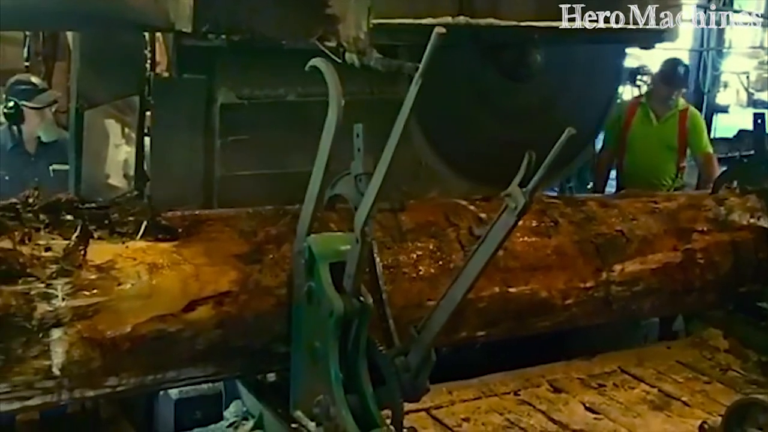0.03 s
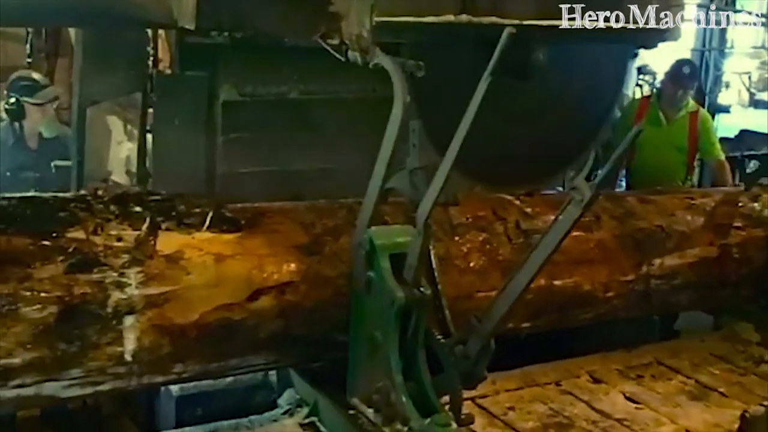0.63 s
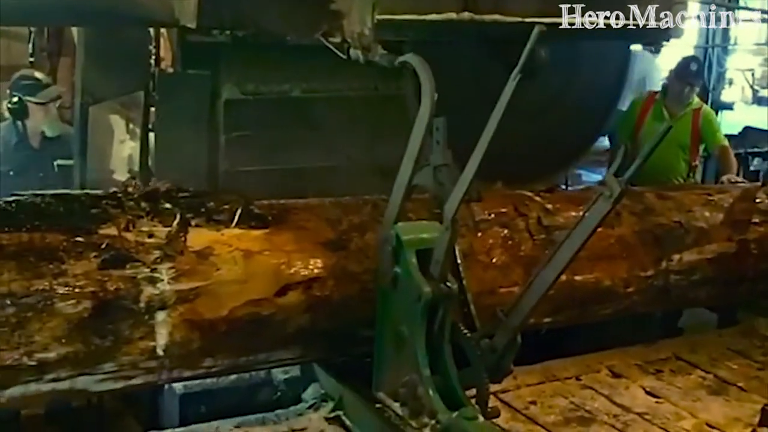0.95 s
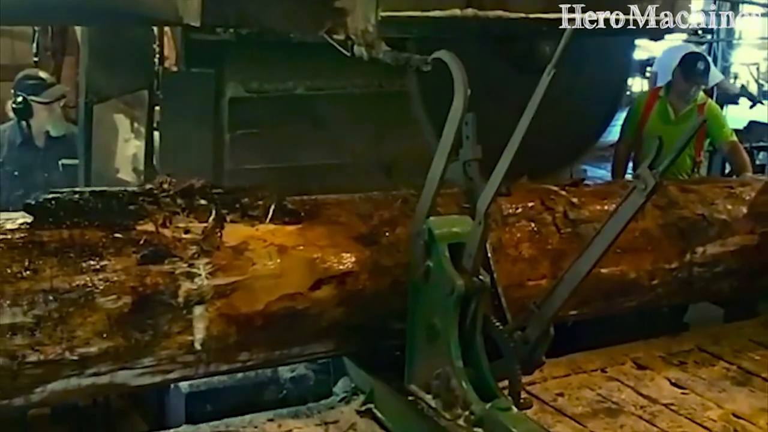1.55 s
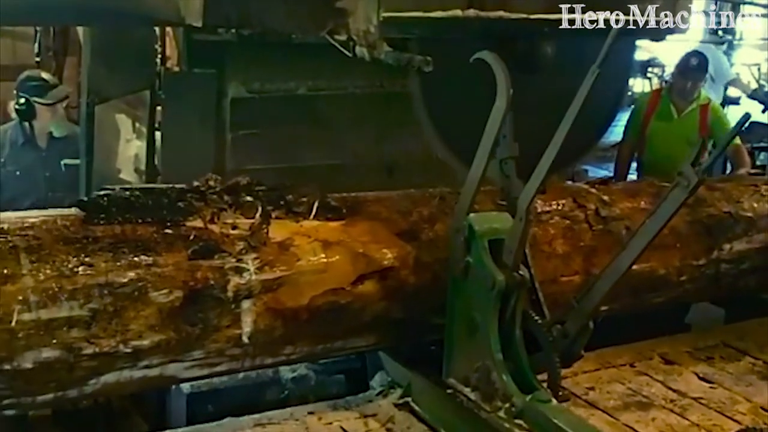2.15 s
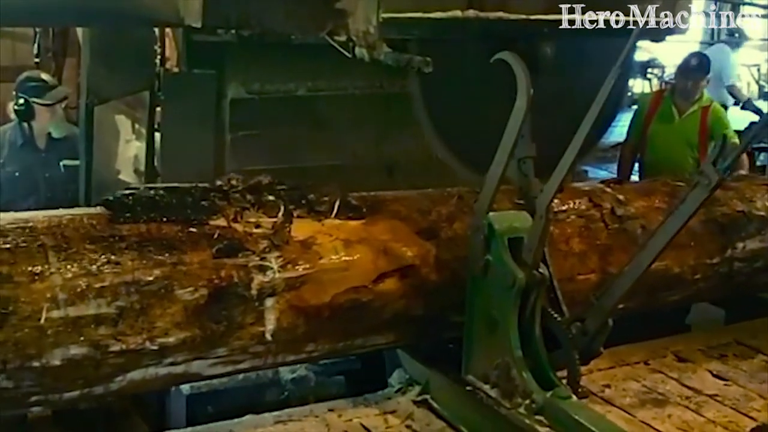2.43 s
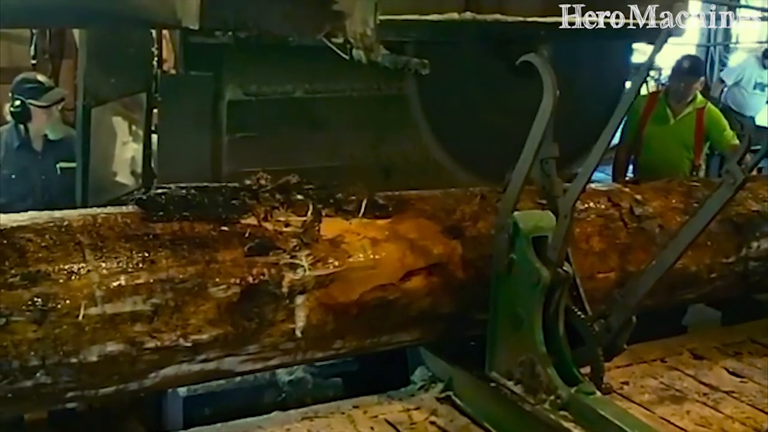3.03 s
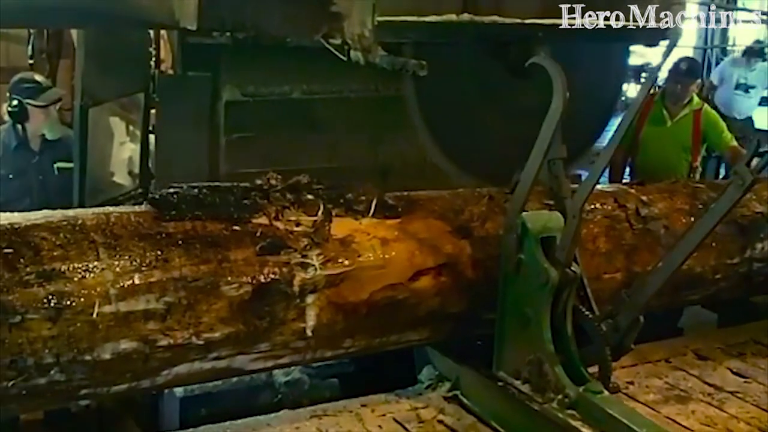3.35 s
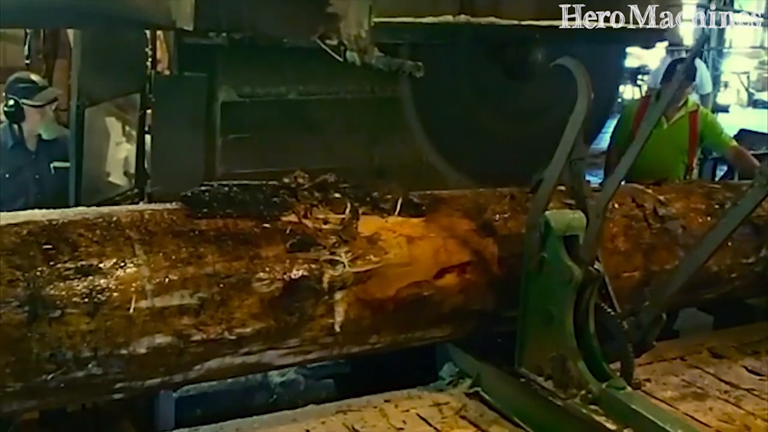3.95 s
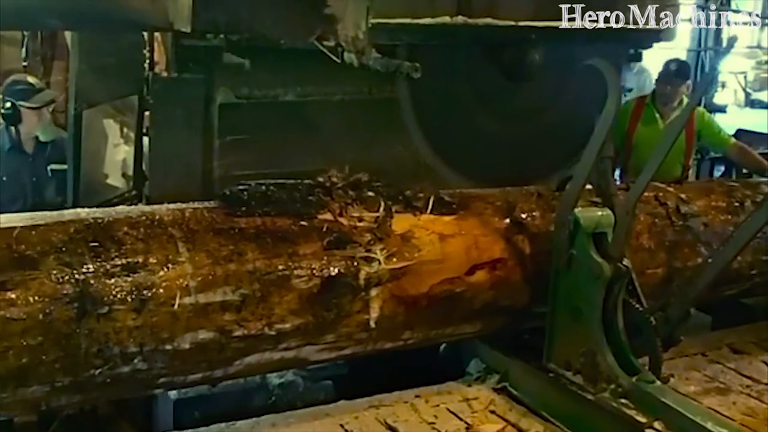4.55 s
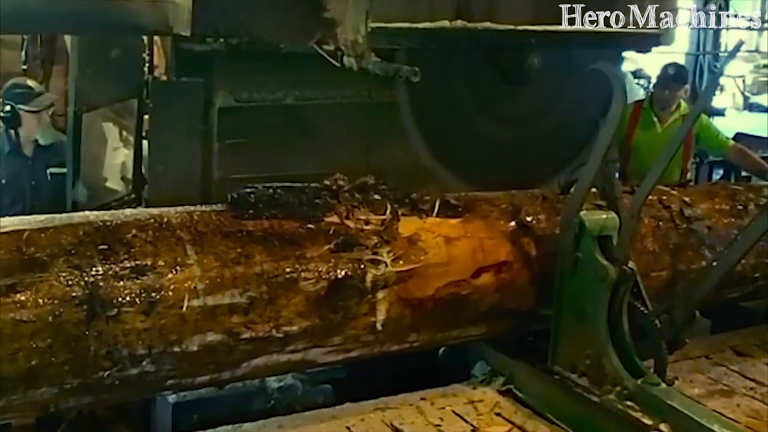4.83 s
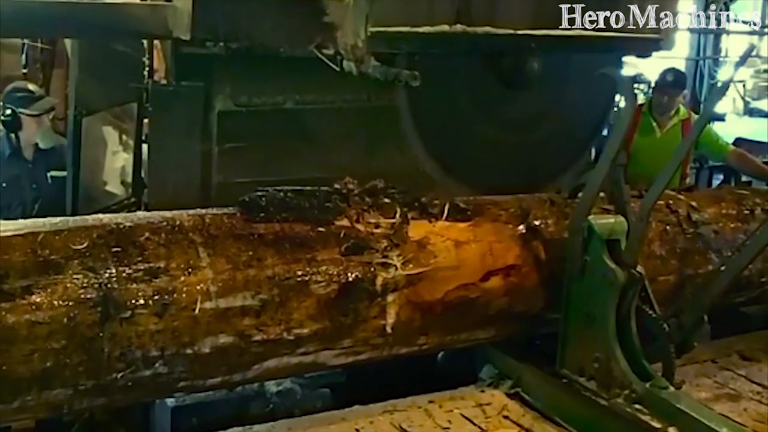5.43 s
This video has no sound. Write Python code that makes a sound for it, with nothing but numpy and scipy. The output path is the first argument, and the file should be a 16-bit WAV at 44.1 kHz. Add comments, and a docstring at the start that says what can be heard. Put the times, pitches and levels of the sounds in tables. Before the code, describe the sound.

Close to a sawmill's big circular blade, a loud, bright rasp and hiss of tearing wood runs on throughout, topped by a shrill ringing whine. The blade slows a little under load, and short squeals swell and fade as it ploughs through the log. Near the end a fast flutter flares and the pitch rises again. The mill hums faintly below.

```python
"""A large circular head saw rips through a log in a sawmill shed, the machinery humming faintly below.
From the start thirty teeth strike the wood: a screaming stack of harmonics over the rasp of torn fibres
and the hiss of sawdust, wobbling once a turn. In the first second the blade sags in speed under load.
It ploughs on, single harmonics squealing out while bands of the noise briefly swell and dip. Around
five seconds the blade's flutter flares and the pitch climbs back."""
import sys
import numpy as np
from scipy import signal
from scipy.fft import rfft, irfft, next_fast_len
from scipy.io import wavfile
from scipy.ndimage import uniform_filter1d, map_coordinates

SR = 44100
rng = np.random.default_rng(int(sys.argv[2]) if len(sys.argv) > 2 else 0)


def unload_audio(sound):
    """Save the sound as a 16-bit wav file, at the path given as the first command line argument."""
    columns = np.transpose(np.atleast_2d(sound))
    # keep every value between -1 and 1, then stretch to whole-number steps
    steps = np.round(np.clip(columns, -1, 1) * 32767)
    wavfile.write(sys.argv[1], SR, steps.astype(np.int16))


N = 246078
TIME = np.arange(N) / SR
TEETH = 30

# Tooth rate, sagging under load: t/s, f/Hz
TOOTH_RATE = [(0, 550.5), (.15, 549.3), (.55, 537), (1.1, 530.7), (1.45, 534.2), (1.95, 535.2),
              (2.35, 527.2), (2.8, 527.9), (3.4, 535.6), (3.6, 539.4), (3.85, 539.5), (4.05, 536.5),
              (4.5, 534.4), (5.15, 546.7), (5.35, 553), (5.58, 555.5)]
# Bite round the rim: angle/turns, level running true/dB, relative flutter weight
RIM_BITE = [(0, .2, 1), (.13, .3, -1.8), (.22, 1.8, .3), (.3, .3, -2), (.42, -1.3, -3.8), (.54, -1.3, -2.8),
            (.64, -.1, 0), (.745, .7, 3.3), (.84, -.3, -2.2), (.94, .4, 1.8)]
# EQ of the tearing wood: f/Hz, level/dB
TEARING_EQ = [(600, -43), (950, -21.5), (1300, -18), (1700, -13.5), (2600, -10), (3200, -0.5), (3800, 11.5),
              (5000, 10.5), (5800, 9), (6350, 9), (7300, 11.5), (8300, 5.5), (10300, -6.5), (15500, -15.5)]
# Sawdust treble, standing for how much wood is thrown out: t/s, relative level/dB
SAWDUST_LOAD = [(0.08, -29.5), (0.26, -27.5), (0.7, -29), (0.73, -27), (1.15, -28.5), (2.31, -27),
                (2.68, -30.5), (3.54, -28.5), (3.67, -31.5), (5.38, -33), (5.5, -32.5)]
# Brief swells and dips in a region of the cutting noise: t/s, half length/s, f/Hz, relative level/dB
BAND_RIDES = [(.2, .12, 6900, 2.3), (.47, .13, 7250, 2.5), (.63, 0.056, 5400, 1.5),
              (0.903, 0.096, 3700, 2.5), (1.003, 0.1, 1900, -2.5), (2.07, 0.17, 5270, 3),
              (2.425, 0.15, 6400, 3.5), (2.873, 0.13, 5200, 4.8), (3.13, .1, 5200, 2.8),
              (3.48, .08, 7800, 2.5), (3.66, .1, 5700, 0), (3.99, .11, 5600, 3.5), (4.62, 0.25, 7760, 3.2),
              (4.975, .17, 5140, -0.5), (5.5, 0.1, 4900, 4)]
# Resonances of the steel plate: f/Hz, width/Hz, boost/dB
PLATE_MODES = [(5830, 200, 1.5), (6850, 150, 1.5), (7125, 170, 4), (7480, 200, 2), (8400, 200, 2),
               (12200, 500, 2.4)]
# Squeals on one tooth harmonic: peak t/s, half length/s, harmonic number, relative level/dB
SQUEAL_CUES = [(0, 0.08, 7, -25), (.15, .14, 9, -28.5), (0.246, 0.36, 4, -44), (.46, 0.16, 3, -35.5),
               (0.703, 0.38, 7, -34.5), (1.17, .08, 3, -40), (1.26, 0.05, 8, -24), (1.42, .1, 9, -34),
               (1.506, 0.12, 7, -33), (1.48, .06, 8, -31), (1.7, 0.073, 8, -28), (1.98, .09, 8, -30),
               (1.86, 0.049, 6, -27), (1.903, .16, 3, -34), (2.29, 0.047, 7, -34), (2.37, .09, 4, -42),
               (2.65, 0.073, 5, -31.5), (2.66, .07, 9, -28), (2.7, 0.048, 7, -23), (3.15, .16, 9, -28),
               (3.595, .1, 8, -24), (3.693, .1, 7, -33), (3.72, 0.25, 3, -36.5), (3.865, 0.099, 8, -27.5),
               (4.04, .09, 6, -26.5), (4.06, .18, 9, -28), (4.198, 0.12, 7, -27.5), (4.25, .2, 4, -44),
               (4.72, 0.08, 9, -32), (4.75, 0.19, 8, -24.5), (5.047, 0.39, 7, -30.5), (5.3, .12, 7, -32),
               (5.34, 0.13, 8, -27), (5.43, .22, 6, -30.5)]
# Buzz of the tooth strikes: harmonic number, relative level/dB
BUZZ_HARMONICS = [(4, -42.5), (5, -39.5), (6, -34.5), (10, -34), (11, -38)]
# Fader of the drone at the tooth rate: t/s, relative level/dB
DRONE_FADER = [(0.0, -48), (0.09, -44.5), (2.17, -61), (2.35, -51), (3.31, -65), (4.12, -66), (4.24, -78),
               (4.51, -58.5), (5.58, -55)]
# Dips in the whine at twice the tooth rate: t/s, depth/dB
WHINE_DIPS = [(.05, 6), (.26, 7), (1.05, 2.5), (2.17, 6), (2.66, 14), (3.12, 9), (3.6, 7), (4.4, 4.5),
              (5.05, 8)]
# EQ of the mill's rumble and clatter: f/Hz, level/dB
MILL_EQ = [(20, -16), (60, -13), (130, -9.5), (220, -10), (300, -3), (380, 0), (480, -3.5), (600, -8),
           (720, 0), (900, -0.5), (1400, -43), (3000, -38)]
# The machinery's low and high hum: f/Hz
HUM_PITCHES = [344, 666]
# Fader of the low hum: t/s, relative level/dB
LOW_HUM_FADER = [(0.0, -72), (0.06, -62), (2.08, -56), (2.7, -76), (4.04, -49.5), (4.4, -64), (5.19, -50.5),
                 (5.52, -64), (5.58, -64)]


def cut(turns, true_db, flutter_db, tooth_depth=0.1, grit_db=0.79):
    """Every tooth tears a burst of fibres; knots and grain make the bursts uneven."""
    pulses = 1 + tooth_depth * np.cos(2 * np.pi * TEETH * turns)
    bursts = pulses * gain_of(true_db + grit_db * wander(rate_hz=27.4))
    noise = plate(equalise(turning_noise(turns, memory=0.37) * bursts, TEARING_EQ))
    crunch, rest = split(noise, hz=2900)
    rasp, rest = split(rest, hz=4600)
    hiss, rest = split(rest, hz=6400)
    fizz, dust = split(rest, hz=9000)
    # the rasp gives way under a heavy load or a swell of hiss
    load, hiss_ride = load_db(), band_ride_db(hz=5160)
    crunch_db = -29 + band_ride_db(hz=2000) + 0.58 * load
    rasp_db = -22 + band_ride_db(hz=3620) - 0.32 * load - 0.62 * np.maximum(hiss_ride, 0)
    hiss_db = -24 + hiss_ride + 0.15 * load
    fizz_db = -28 + band_ride_db(hz=8000) + 0.58 * load
    dust_db = -31.5 + 0.99 * load
    # flutter is strongest near the rim's resonance
    return (unit_rms(crunch * gain_of(0.07 * flutter_db)) * gain_of(crunch_db)
            + unit_rms(rasp * gain_of(0.4 * flutter_db)) * gain_of(rasp_db)
            + unit_rms(hiss * gain_of(0.19 * flutter_db)) * gain_of(hiss_db)
            + unit_rms(fizz) * gain_of(fizz_db)
            + unit_rms(dust) * gain_of(dust_db))


def turning_noise(turns, memory, points_per_turn=2600):
    """Noise laid round the rim: each turn partly repeats the one before."""
    fresh = rng.standard_normal((128, points_per_turn))
    laps = signal.lfilter([1], [1, -memory], fresh, axis=0)
    return unit_rms(map_coordinates(laps.ravel(), [(turns + 10) * points_per_turn], order=3))


def plate(x):
    """Each resonance of the steel lifts a narrow band of whatever shakes the blade."""
    return x + sum((gain_of(db) - 1) * signal.lfilter(*signal.iirpeak(hz, hz / width, SR), x)
                   for hz, width, db in PLATE_MODES)


def load_db():
    """How far the wood thrown out is above its average."""
    level = automation(SAWDUST_LOAD)
    return level - level.mean()


def band_ride_db(hz, half_width_octaves=0.54):
    """Brief swells and dips of the cutting noise around a frequency."""
    return sum(db * swell(t, half_s) * np.exp(-(np.log2(hz / centre) / half_width_octaves) ** 2)
               for t, half_s, centre, db in BAND_RIDES)


def tooth_harmonic(teeth, number):
    """One harmonic of the strikes: unequal teeth bend it alike each turn, the grain bends it by chance."""
    # errors of spacing and height, alike for neighbouring teeth
    errors = uniform_filter1d(rng.standard_normal((2, TEETH)), size=3, axis=1, mode="wrap")
    spacing, height = (np.interp(teeth, np.arange(TEETH), unit_rms(e - e.mean()), period=TEETH)
                       for e in errors)
    phase = 0.25 * spacing + 0.045 * number * wander(rate_hz=35) + wander(rate_hz=5)
    strength = unit_rms(1 + 0.22 * height + 0.2 * wander(rate_hz=45))
    return np.sqrt(2) * strength * np.cos(2 * np.pi * (number * teeth + rng.random()) + phase)


def scream(harmonics, centre_hz=4150, half_width_hz=750):
    """The rim's resonance picks out the nearest tooth harmonics; they duck when the hiss swells."""
    rate = automation(TOOTH_RATE)
    numbers = (7, 8, 9)
    weights = np.array([1 / (1 + ((k * rate - centre_hz) / half_width_hz) ** 2) for k in numbers])
    weights /= np.linalg.norm(weights, axis=0)
    stack = sum(weight * harmonics[k] for k, weight in zip(numbers, weights))
    return stack * gain_of(-25.5 - 2 * band_ride_db(hz=5000))


def squeals(harmonics):
    """Single harmonics swell out of the stack for a moment and die away."""
    return sum(gain_of(db) * swell(t, half_s) * harmonics[round(k)] for t, half_s, k, db in SQUEAL_CUES)


def buzz(harmonics):
    """Rough harmonics of the strikes, louder under load; each flares and fades as the log moves."""
    strikes = sum(gain_of(db + 2.2 * wander(rate_hz=4)) * harmonics[round(k)]
                  for k, db in BUZZ_HARMONICS)
    return strikes * gain_of(0.76 + 0.5 * load_db())


def air_tones(teeth):
    """Teeth sweep past the log: a drone, a whine an octave up, and a third tone that rides the load."""
    dips_db = sum(db * swell(t, half_s=0.1) for t, db in WHINE_DIPS)
    whine_db = -40 + 1.3 * wander(rate_hz=3.7) - dips_db
    third_db = -42 + 1.9 * load_db() - 3.6 * band_ride_db(hz=5040) + 1.3 * wander(rate_hz=4.4)
    drone = gain_of(automation(DRONE_FADER) - 1) * rough_tone(teeth, rough=0.035, width_hz=18)
    whine = gain_of(whine_db) * rough_tone(2 * teeth, rough=0.075, width_hz=25)
    return drone + whine + gain_of(third_db) * tooth_harmonic(teeth, 3)


def mill(turns):
    """The bed: steady rumble, clatter that recurs with the shaft and grows with load, two wavering hums."""
    rumble, clatter = split(equalise(turning_noise(turns, memory=0.45), MILL_EQ), hz=229)
    hum_levels_db = automation(LOW_HUM_FADER) - 1, -62 + 1.24 * TIME
    hums = sum(gain_of(db) * rough_tone(hz * TIME, rough=0.86, width_hz=9)
               for hz, db in zip(HUM_PITCHES, hum_levels_db))
    return gain_of(-68) * unit_rms(rumble) + gain_of(-50.5 + 0.6 * load_db()) * unit_rms(clatter) + hums


def rough_tone(cycles, rough, width_hz):
    """A tone with the share `rough` of its power scattered into a narrow skirt."""
    scatter = (wander(width_hz) + 1j * wander(width_hz)) * np.sqrt(rough)
    carrier = np.exp(2j * np.pi * (cycles + rng.random()))
    return ((np.sqrt(2 * (1 - rough)) + scatter) * carrier).real


def wander(rate_hz, points=4096):
    """Smooth random modulation of rms 1, with little motion above the given rate."""
    f = np.fft.rfftfreq(points, N / SR / points)
    slow = irfft(rfft(rng.standard_normal(points)) / np.sqrt(1 + (f / rate_hz) ** 4))
    return unit_rms(np.interp(np.arange(N), np.linspace(0, N, points), slow))


def swell(peak_s, half_s):
    """A bell-shaped envelope peaking at 1."""
    return np.exp(-((TIME - peak_s) / half_s) ** 2)


def automation(points):
    """Straight ramps between (time, value) breakpoints."""
    return np.interp(TIME, *np.transpose(points))


def equalise(x, points):
    """Applies an EQ curve drawn through (frequency, level) points."""
    hz, db = np.transpose(points)
    size = next_fast_len(N)
    f = np.fft.rfftfreq(size, 1 / SR)
    curve_db = np.interp(np.log(f + 1), np.log(hz), db)
    return irfft(rfft(x, size) * gain_of(curve_db), size)[:N]


def split(x, hz):
    """A crossover: the bands below and above a frequency."""
    lowpass = signal.butter(6, hz, fs=SR, output="sos")
    low = signal.sosfiltfilt(lowpass, x, padtype="even", padlen=4000)
    return low, x - low


def gain_of(db):
    """Decibels to amplitude."""
    return 10 ** (np.asarray(db) / 20)


def unit_rms(x):
    """Scales to an rms of 1."""
    return x / np.sqrt(np.mean(x ** 2) + 1e-20)


def scene():
    """One turning blade drives the cut and its ringing and wobbles them once a turn; the mix is mono."""
    teeth = np.cumsum(automation(TOOTH_RATE)) / SR  # teeth passed so far
    turns = teeth / TEETH
    angle, rim_db, flutter_weight = np.transpose(RIM_BITE)
    true_db = np.interp(turns, angle, rim_db, period=1)
    # flutter creeps up through the cut and flares once
    flutter_depth = 0.033 + 0.021 * TIME + 0.62 * swell(peak_s=5.05, half_s=0.31)
    flutter_db = np.interp(turns, angle, flutter_weight, period=1) * flutter_depth
    harmonics = {k: tooth_harmonic(teeth, k) for k in range(3, 13)}
    ringing = (scream(harmonics) + squeals(harmonics)) * gain_of(4.6 * flutter_db) + buzz(harmonics)
    mono = cut(turns, true_db, flutter_db) + ringing * gain_of(true_db) + air_tones(teeth) + mill(turns)
    return np.array([mono, mono])


def record(dry, threshold_db=-13.1, cutoff_hz=15780):
    """A quick limiter holds down the loudest swells; a steep low-pass trims the top."""
    power_db = 10 * np.log10(abs(uniform_filter1d((dry ** 2).mean(0), size=250)) + 1e-12)
    over_db = uniform_filter1d(np.maximum(power_db - threshold_db, 0), size=150)
    held = dry * gain_of(-0.55 * over_db)
    taps = signal.firwin(801, cutoff_hz, window=("kaiser", 9), fs=SR)
    return signal.oaconvolve(held, taps[None], "same")


dry = scene()
out = record(dry)
unload_audio(out)
```